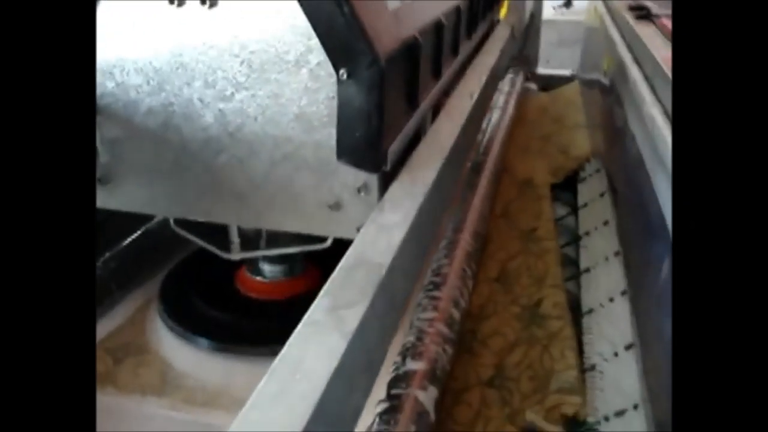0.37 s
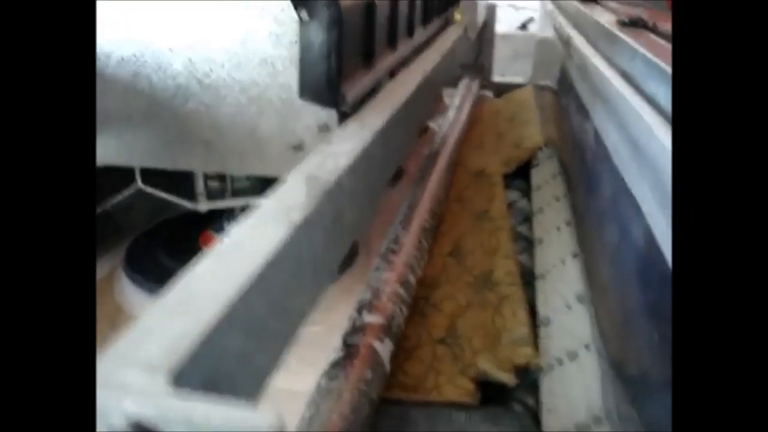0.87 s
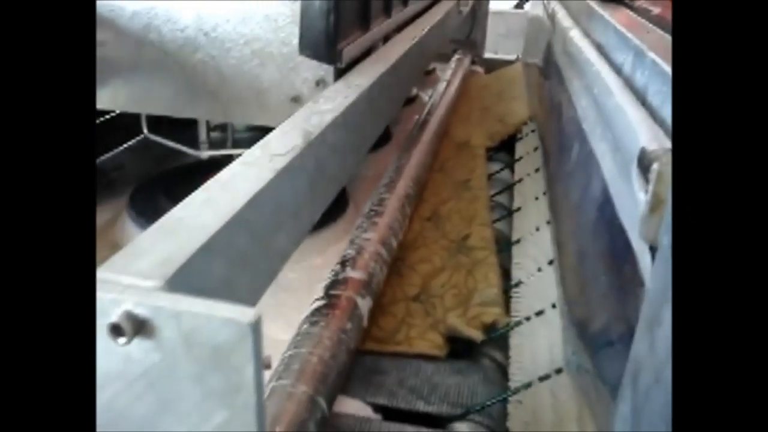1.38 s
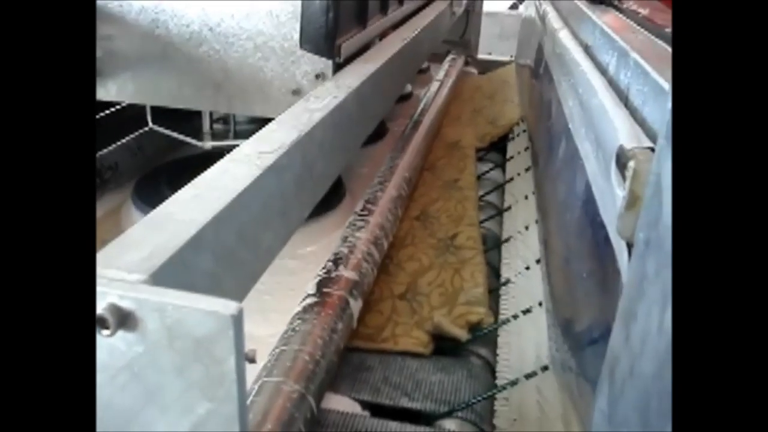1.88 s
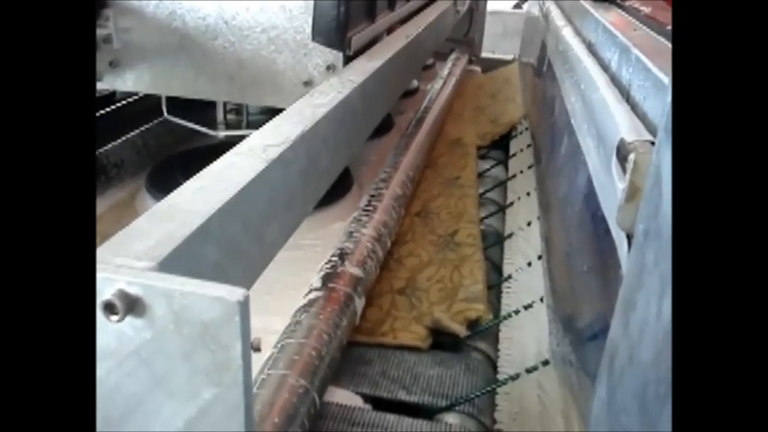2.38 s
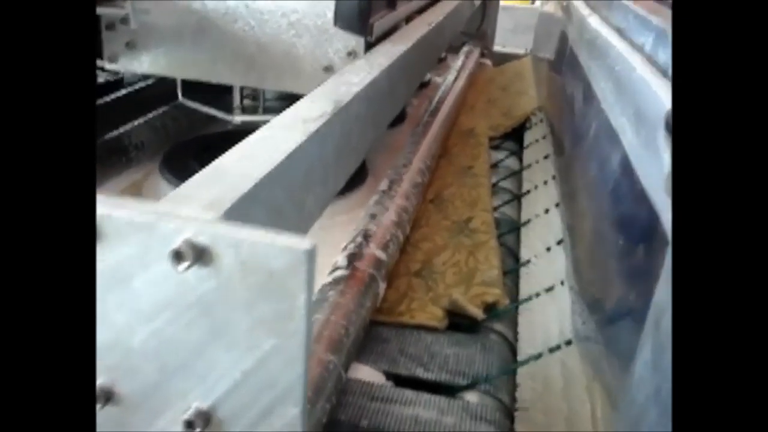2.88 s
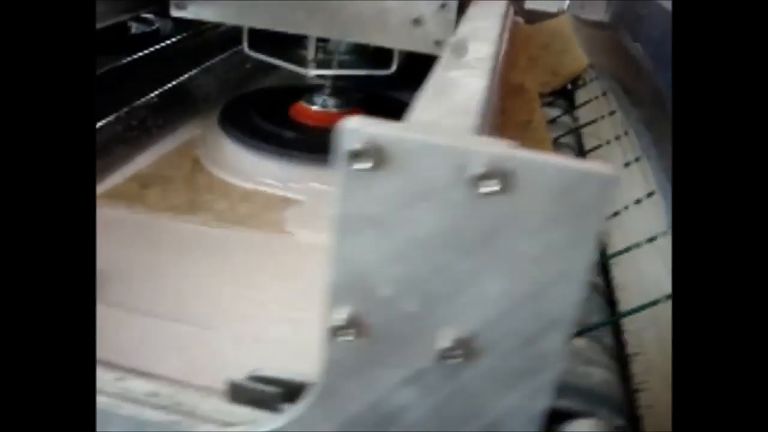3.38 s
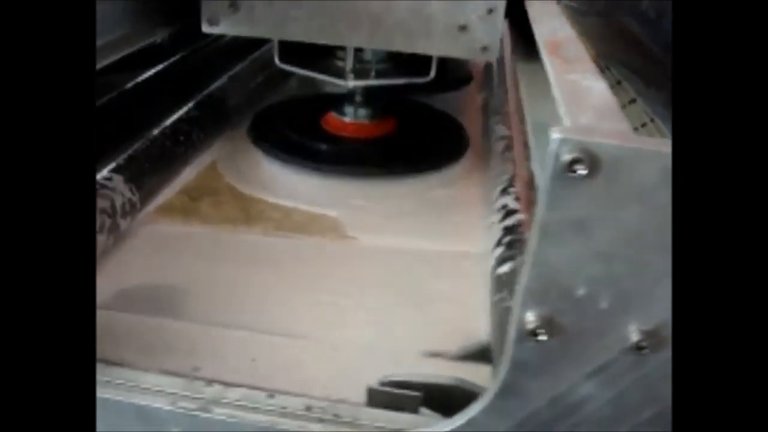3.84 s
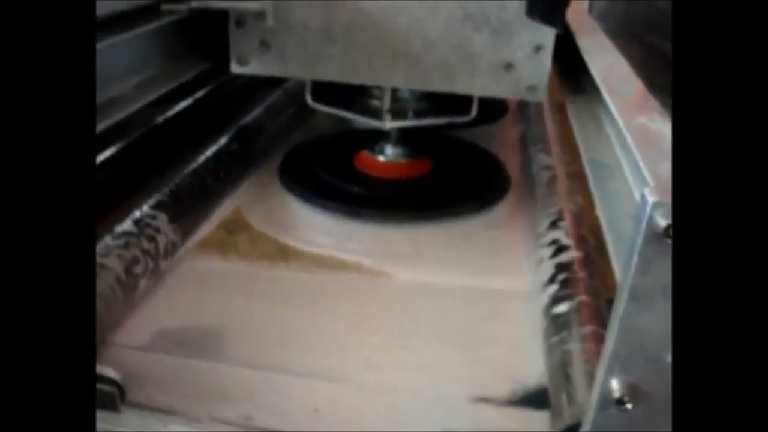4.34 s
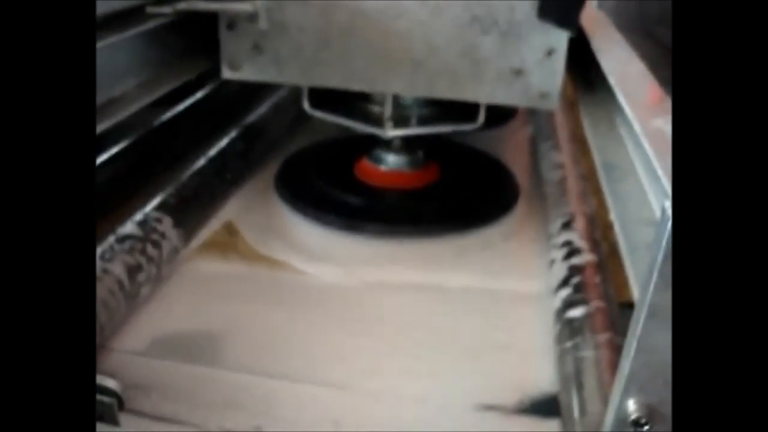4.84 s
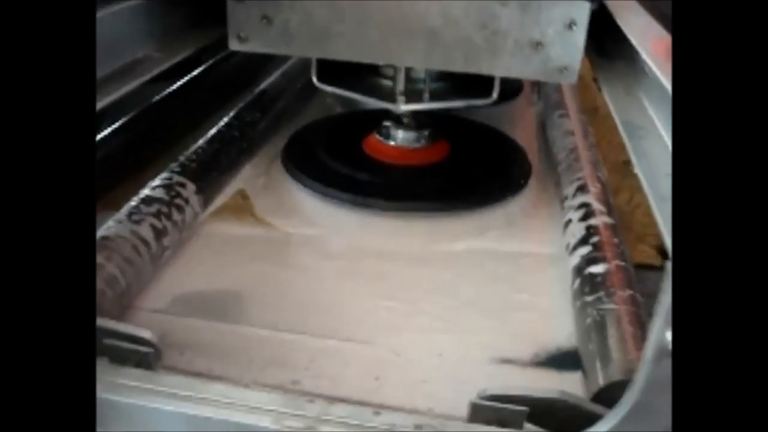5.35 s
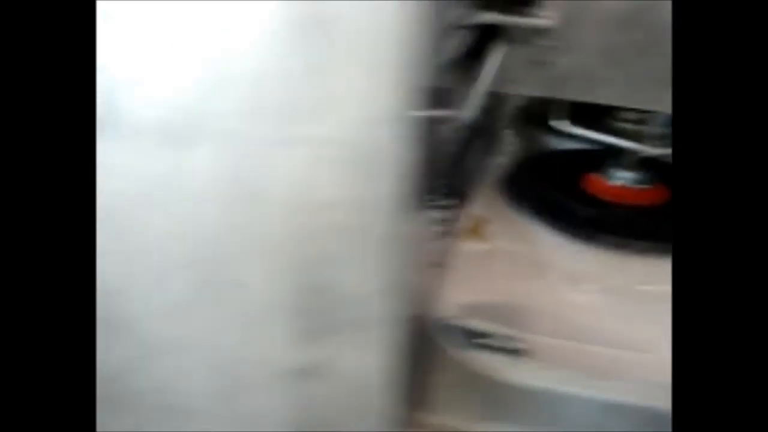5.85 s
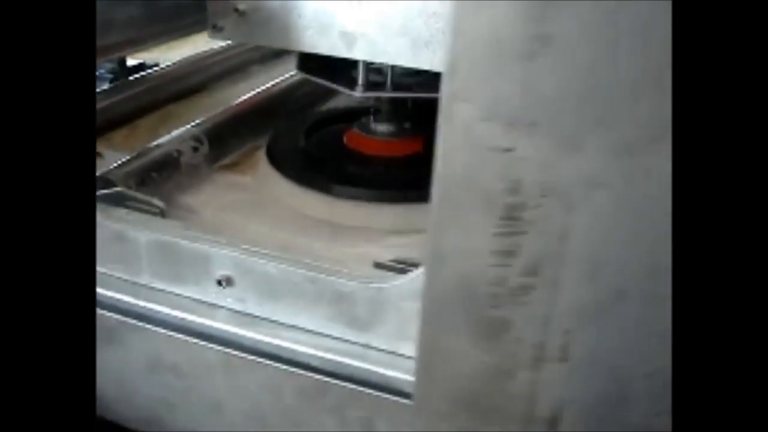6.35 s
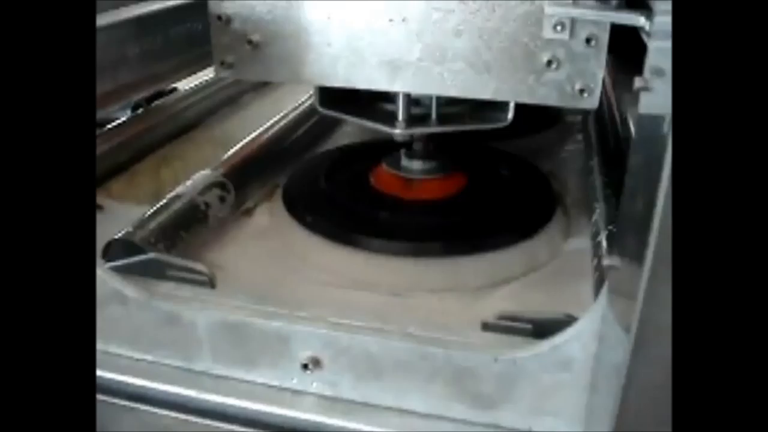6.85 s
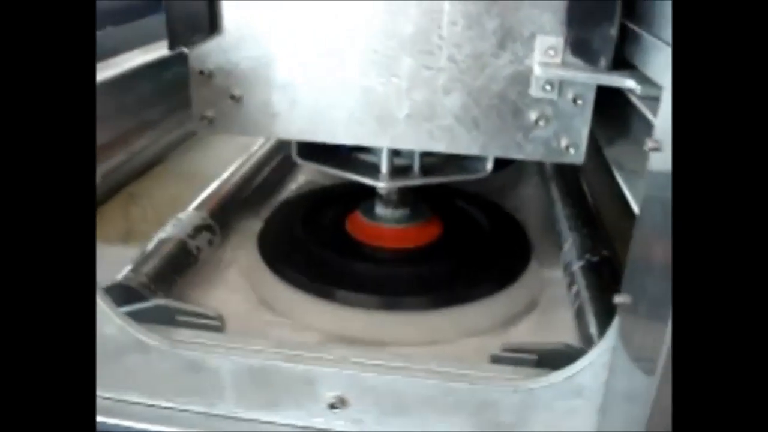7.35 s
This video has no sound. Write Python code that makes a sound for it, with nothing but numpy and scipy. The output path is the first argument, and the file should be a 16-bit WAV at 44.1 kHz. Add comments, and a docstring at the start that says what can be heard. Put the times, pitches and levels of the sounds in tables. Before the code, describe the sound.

Inside a hard, echoing workshop, a rug washing machine runs continuously. Brushes and spray make a dense, loud hissing rush with a hollow metallic ring. Over it a high, thin blower whine swells and dips unevenly as the hand-held microphone moves close along the frame. A faint nozzle whistle sinks away, and a low drive hum is barely noticeable underneath.

```python
"""A rug washing machine runs in a workshop, heard by one hand-held microphone that moves along its frame.
From the start brushes and spray rush (coloured noise that rings in the metal trough), a nozzle whistles
and a blower whines (harmonics of its blade tone), swelling in the hall's standing waves; the whole dips as it gets loud.
Soon a low drive hum (two harmonics) swells too; near 3 s its pitch climbs. Near 4.4 s the whine sags
in pitch, then recovers; by 6 s the whistle has sunk into the rush."""
import sys
import numpy as np
from scipy import signal
from scipy.io import wavfile
from scipy.ndimage import uniform_filter1d

SR = 44100
rng = np.random.default_rng(int(sys.argv[2]) if len(sys.argv) > 2 else 0)


def rack_gain(trim_db):
    """Turn a fader trim in dB into the linear factor to multiply a signal by."""
    fader = np.asarray(trim_db, float)
    return 10 ** (fader / 20)


def put_to_file(sound):
    """Save the sound as 16-bit audio at rate SR, in the file named by the first command-line argument."""
    columns = np.atleast_2d(sound).T  # one column per channel
    safe = np.clip(columns, -1, 1)
    whole_steps = np.round(safe * 32767)
    wavfile.write(sys.argv[1], SR, whole_steps.astype(np.int16))


N = 340452  # length in samples


def in_time(rows, s):
    """Joins the rows of a table with straight lines; the first column is time."""
    times, *columns = np.transpose(rows)
    return [np.interp(s, times, column) for column in columns]


def drift(rate_hz):
    """Slow chance: coarse noise joined by straight lines, spread about 1."""
    points = rng.standard_normal(4000)
    return np.interp(np.arange(N) * rate_hz / SR, np.arange(4000), points)


def patches(hz, s, width_hz, last_s):
    """A random field over frequency and time, smooth over width_hz and last_s; spread 1."""
    bins = max(1, round(width_hz / hz[1, 0]))
    steps = max(1, round(last_s / s[1]))
    field = rng.standard_normal((len(hz), len(s)))
    for _ in range(2):
        field = uniform_filter1d(field, size=bins, axis=0)
        field = uniform_filter1d(field, size=steps, axis=1)
    return field / field.std()


def bell(hz, centre_hz, width_hz):
    """Shape of a resonance, 1 on top and half at half the width to either side."""
    return 1 / (1 + (2 * (hz - centre_hz) / width_hz) ** 2)


def coloured(x, size, colour_db):
    """Cuts x into short-time spectra, scales each by colour_db(hz, s) and joins them again."""
    overlap = size * 3 // 4
    hz, s, frames = signal.stft(x, SR, nperseg=size, noverlap=overlap)
    hz_column = np.maximum(hz, 1)[:, None]
    shaped = frames * rack_gain(colour_db(hz_column, s))
    return signal.istft(shaped, SR, nperseg=size, noverlap=overlap)[1][:N]


def splash(hz, s):
    """The spray comes unevenly: its treble flickers in wide bands and in small flecks."""
    wide_db = 0.63 * patches(hz, s, width_hz=3000, last_s=0.02)
    flecks_db = 1.24 * patches(hz, s, width_hz=200, last_s=0.015)
    return (wide_db + flecks_db) / (1 + (3500 / hz) ** 4)


# what the microphone's place does to the rush:
# start_s, rumble_lift_db, spray_lift_db (how open the view is), low_trough_ring_hz, upper_trough_ring_hz
PLACE_PATH = [(0, 2, -1, 877, 1010), (.6, 1.5, -1.5, 892, 1030), (1.2, 2.5, -2, 960, 1170),
              (3, 0.5, -.5, 985, 1140), (4.5, 0.5, 1.5, 915, 1095), (5.6, 1.5, 1, 945, 1080),
              (6.6, 0, -1.5, 930, 1133), (7.2, -0.5, 2, 934, 1114), (7.72, -3.5, -1, 1014, 1100)]
# plain colour of brushes and spray, only the shape counts: pitch_hz, level_db (per Hz)
RUSH_COLOUR = [(15, -64.5), (25, -27), (75, -30.5), (128, -17.5), (200, -16.5), (447, -14), (560, -9),
               (1070, -6.5), (1450, -6.5), (1820, -5.5), (2280, -8), (2650, -4), (2860, -6.5),
               (7980, -14.5), (10000, -20.5), (13000, -56), (22000, -120)]
# weaker steady resonances of the frame: pitch_hz, width_hz, lift_db
FRAME_RINGS = [(202, 53, 1.5), (620, 90, 1), (2440, 55, -1), (3334, 150, 2.5), (4260, 81, 2),
               (4780, 460, 2)]
LOW_RING_DB, UPPER_RING_DB, TROUGH_WIDTH_HZ = 5.5, 5, 82
GUARD_RING_DB, GUARD_HZ, GUARD_WIDTH_HZ = 5.5, 1845, 117
RING_SWAY_DB = 0.8  # rings wax and wane by chance
NOZZLE_START_DB, NOZZLE_LOSS_DB_PER_S = 6, 1  # the whistle is left behind
NOZZLE_HZ, NOZZLE_WIDTH_HZ = 6270, 120
RUMBLE_TOP_HZ, SPRAY_FROM_HZ = 420, 11000  # half of the lift is left here


def swaying(ring_db, s):
    """Lift of a ring that wanders slowly about ring_db."""
    return ring_db + RING_SWAY_DB * np.interp(s, np.arange(N) / SR, drift(1.5))


def nozzle_whistle(hz, s):
    """A narrow lift of the rush that comes and goes by chance and sinks steadily."""
    sputter = np.clip(1 + 0.5 * rng.standard_normal(len(s)), 0, 2)
    lift_db = (NOZZLE_START_DB - NOZZLE_LOSS_DB_PER_S * s) * sputter
    return lift_db * bell(hz, NOZZLE_HZ, NOZZLE_WIDTH_HZ)


def machine_colour(hz, s):
    """Spectrum of the rush, the rings of the metalwork, the microphone's place and chance peaks."""
    rumble_db, spray_db, low_hz, upper_hz = in_time(PLACE_PATH, s)
    colour_hz, colour_db = np.transpose(RUSH_COLOUR)
    db = np.interp(np.log(hz), np.log(colour_hz), colour_db)
    for centre_hz, width_hz, lift_db in FRAME_RINGS:
        db = db + lift_db * bell(hz, centre_hz, width_hz)
    db = db + swaying(LOW_RING_DB, s) * bell(hz, low_hz, TROUGH_WIDTH_HZ)
    db = db + swaying(UPPER_RING_DB, s) * bell(hz, upper_hz, TROUGH_WIDTH_HZ)
    db = db + swaying(GUARD_RING_DB, s) * bell(hz, GUARD_HZ, GUARD_WIDTH_HZ)
    db = db + nozzle_whistle(hz, s)
    db = db + rumble_db / (1 + (hz / RUMBLE_TOP_HZ) ** 4)
    db = db + spray_db / (1 + (SPRAY_FROM_HZ / hz) ** 4)
    # narrow peaks and dips in the rush come and go by chance, each lasting about half a second
    return db + 1.79 * patches(hz, s, width_hz=25, last_s=0.5)


def rush():
    """White noise takes on the splash of the spray, then the colour of the machine."""
    noise = rng.standard_normal(N)
    spray = coloured(noise, size=512, colour_db=splash)
    sound = coloured(spray, size=4096, colour_db=machine_colour)
    return rack_gain(-17) * sound / sound.std()  # overall level in dB


def swells(rows, s, floor_db):
    """Level in dB of a tone that rises and sinks as one smooth arch through each loud spot."""
    height = rack_gain(floor_db)  # left between loud spots
    for peak_s, length_s, peak_db in rows:
        across = np.clip((s - peak_s) / length_s, -0.5, 0.5)
        height = height + rack_gain(peak_db) * np.cos(np.pi * across) ** 2
    return 20 * np.log10(height)


def tones(hz, harmonic_db, waver_hz, waver_rate, flutter_db, smear_rad):
    """Harmonics of an unsteady pitch; the hall's many paths shake level and phase, more so higher up."""
    phase = 2 * np.pi * np.cumsum(hz + waver_hz * drift(waver_rate)) / SR
    out = 0
    for order, db in enumerate(harmonic_db, start=1):
        shaken_db = db + order * flutter_db * drift(18.0)
        shaken_phase = order * (phase + smear_rad * drift(15.0))
        out = out + np.sqrt(2) * rack_gain(shaken_db) * np.sin(shaken_phase)
    return out


# pitch of the blower's blade tone before its small waver: start_s, pitch_hz
BLADE_PITCH = [(0, 2661), (0.8, 2660), (3.75, 2661), (4.05, 2646), (4.4, 2641), (4.7, 2645), (5.4, 2654),
               (6, 2669), (6.7, 2670), (7, 2666), (7.4, 2658), (7.72, 2657)]
# loud spots of the standing waves that the microphone crosses, each added to the floor:
# peak_s, length_s, peak_db
WHINE_SPOTS = [(.15, .49, -15), (.47, 0.26, -22), (.62, 0.33, -21), (.9, .35, -20.5), (1.15, 0.67, -15.5),
               (1.52, 0.92, -21.5), (1.81, 0.28, -27), (2.3, 1, -23.5), (2.79, 0.65, -20),
               (2.98, .24, -24.5), (3.31, 0.59, -22), (3.68, 0.31, -20), (3.87, 0.31, -22),
               (4.03, 0.17, -22), (4.22, 0.46, -29.5), (4.63, 0.31, -22), (4.76, .14, -21),
               (4.93, 0.28, -16), (5.17, 0.49, -20.5), (5.45, 0.36, -23), (5.67, 0.25, -20),
               (5.84, .12, -32), (5.94, .12, -19.5), (6.07, 0.17, -16), (6.33, 0.58, -19.5),
               (6.7, 0.48, -13.5), (7.0, 0.28, -18.5), (7.18, .25, -32), (7.47, 0.41, -16),
               (7.72, 0.11, -31)]
# the same for its 2nd harmonic: peak_s, length_s, peak_db
OVERTONE_SPOTS = [(0, 0.23, -31), (.57, 0.38, -34), (1.12, 0.32, -32), (1.4, 0.9, -35), (1.81, 0.24, -36),
                  (2.3, 0.57, -40), (3.13, 0.21, -40), (3.39, .28, -35), (3.92, .3, -38), (4.4, .4, -43),
                  (4.85, 0.33, -38), (5.15, .45, -34), (5.36, 0.23, -31), (5.84, .3, -36), (6.45, .54, -37),
                  (6.83, .23, -35), (7.01, 0.21, -37), (7.6, .9, -33.5)]


def blower_whine(s):
    """Fan blades give a tone with two overtones; the first two parts swell in loud spots."""
    first_db = swells(WHINE_SPOTS, s, floor_db=-40.5)
    second_db = swells(OVERTONE_SPOTS, s, floor_db=-45.5)
    third_db = -48 + 3 * drift(2.8)  # fades by chance
    pitch_hz, = in_time(BLADE_PITCH, s)
    return tones(pitch_hz, [first_db, second_db, third_db],
                 waver_hz=1.5, waver_rate=12.0, flutter_db=1.3, smear_rad=0.35)


# loud spots of the drive hum, each added to the floor: peak_s, length_s, peak_db
HUM_SPOTS = [(1.45, 2.4, -42), (2.05, 0.58, -50), (2.85, 0.5, -44.5), (3.8, 1.1, -45.5),
             (4.75, 0.63, -46.5)]
# the drive speeds up once and is left behind: start_s, pitch_hz, second_harmonic_db
DRIVE_SPEED = [(0, 185.5, -49), (2.2, 186.3, -42), (2.85, 183.3, -53), (3.15, 197.4, -52),
               (4.75, 210.5, -61), (7.72, 207.5, -62)]


def drive_hum(s):
    """The turning drive hums on a pitch that follows its speed, with a 2nd harmonic."""
    pitch_hz, second_db = in_time(DRIVE_SPEED, s)
    first_db = swells(HUM_SPOTS, s, floor_db=-59)
    return tones(pitch_hz, [first_db, second_db],
                 waver_hz=4.0, waver_rate=8.0, flutter_db=2.0, smear_rad=0.55)


def scene():
    """Adds the sources; one microphone feeds both channels."""
    s = np.arange(N) / SR
    mono = rush() + blower_whine(s) + drive_hum(s)
    return np.tile(mono, (2, 1))


def gain_control(x, hold_db, squeeze, follow_s):
    """Gain falls by a share of each dB the smoothed level stands above hold_db, and rises below it."""
    r = np.exp(-1 / (follow_s * SR))
    start = [r * rack_gain(2 * hold_db)]  # begins as if the level had been hold_db
    power = signal.lfilter([1 - r], [1, -r], x[0] ** 2, zi=start)[0]
    over_db = 10 * np.log10(power + 1e-12) - hold_db
    return x * rack_gain(-squeeze * over_db)


def band_limit(x):
    """A steep low-pass at the top of the band."""
    return signal.sosfilt(signal.butter(12, 10710, fs=SR, output="sos"), x)


def record(dry):
    """The microphone's gain control, then a steep cut of the top."""
    held = gain_control(dry, hold_db=-14.5, squeeze=0.39, follow_s=0.023)
    low_pass = signal.ellip(12, 0.3, 75, 9976, fs=SR, output="sos")  # ripple dB, stop dB, cutoff Hz
    mix = signal.sosfilt(low_pass, held)
    return band_limit(mix)


dry = scene()
out = record(dry)
put_to_file(out)
```